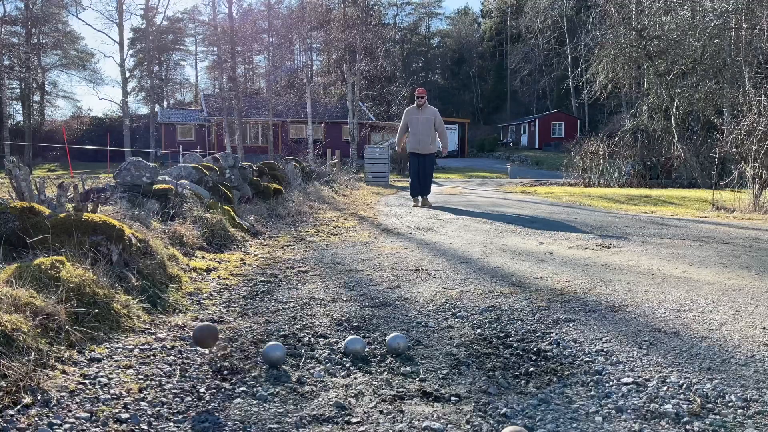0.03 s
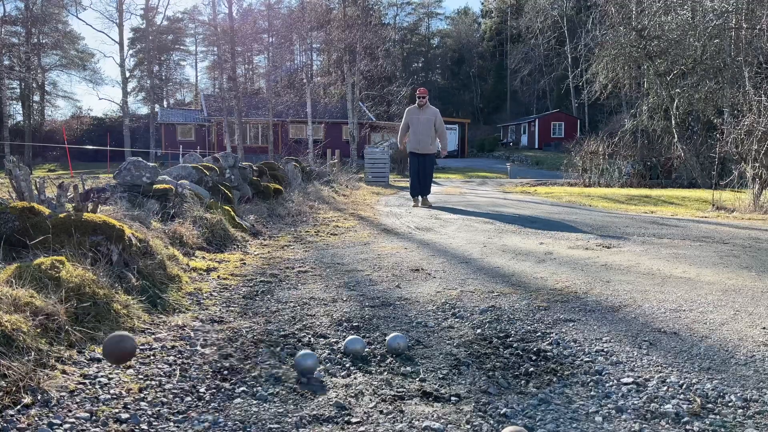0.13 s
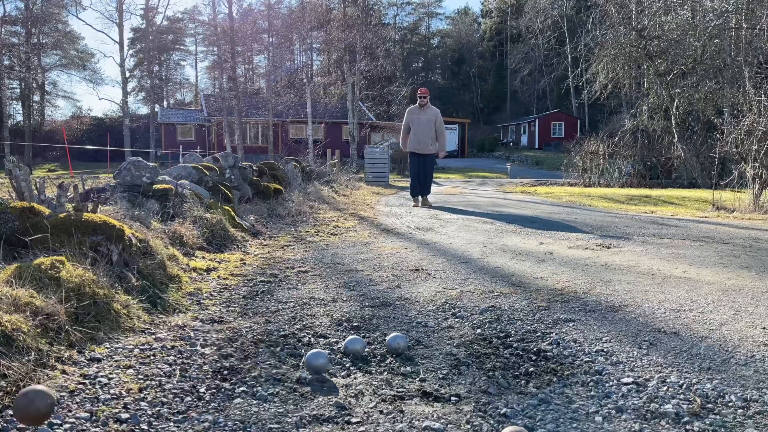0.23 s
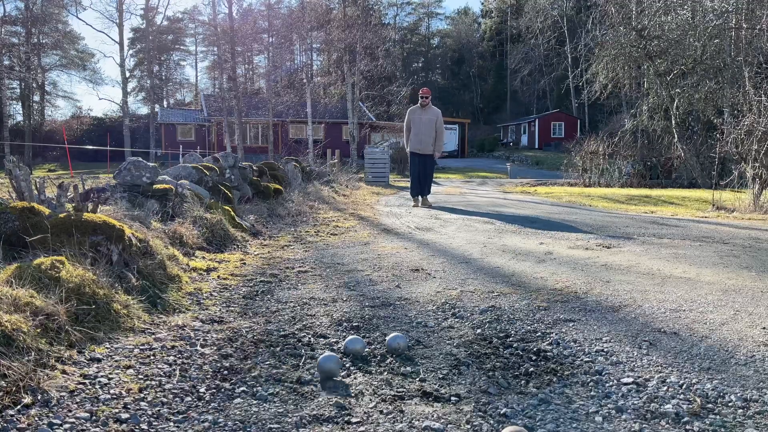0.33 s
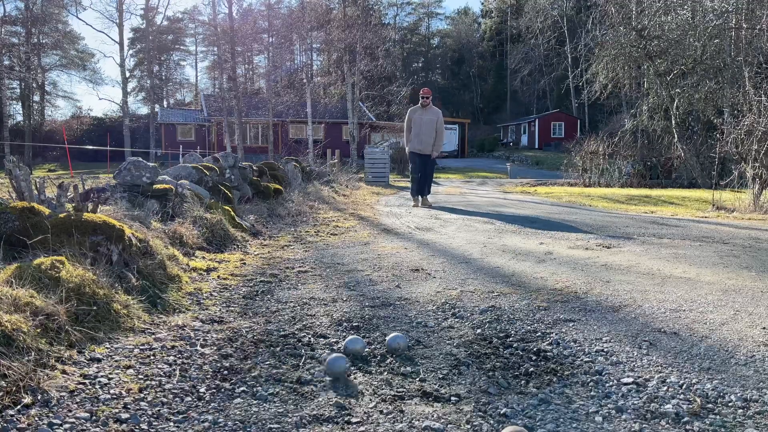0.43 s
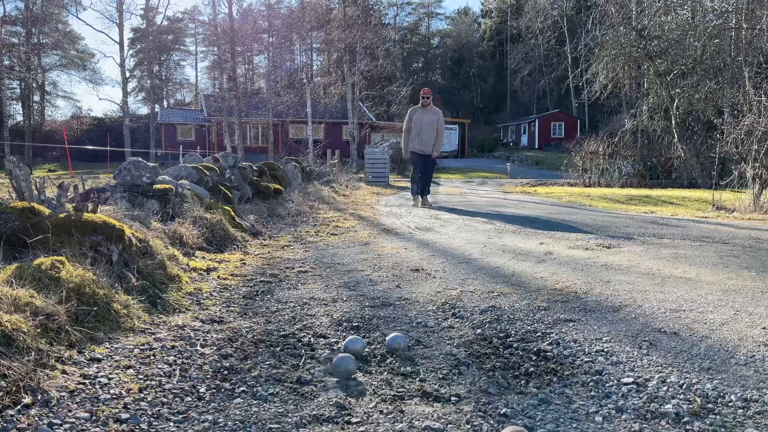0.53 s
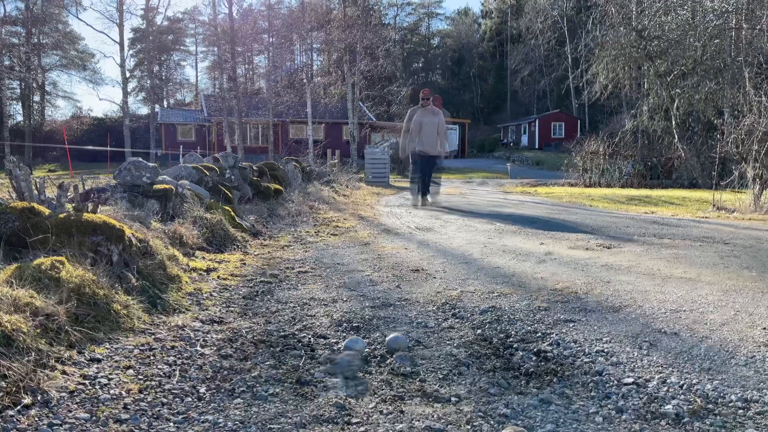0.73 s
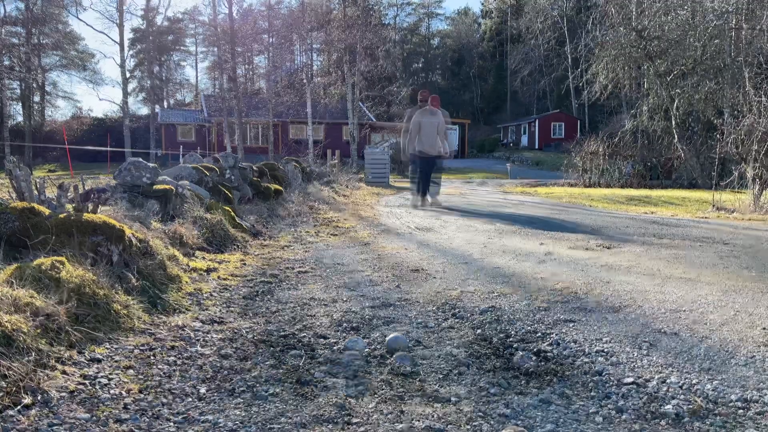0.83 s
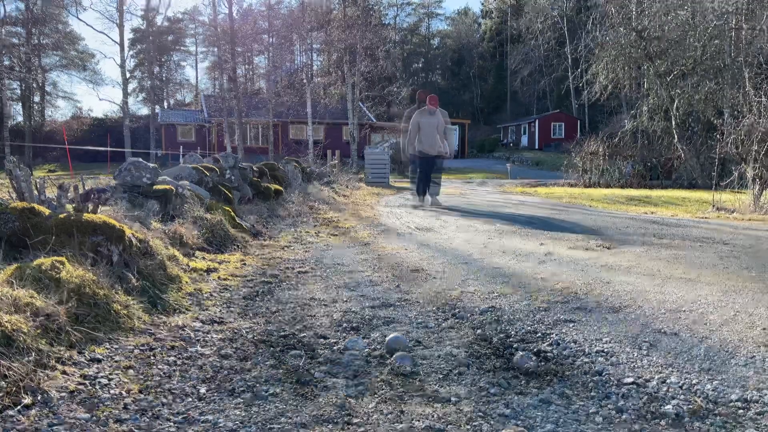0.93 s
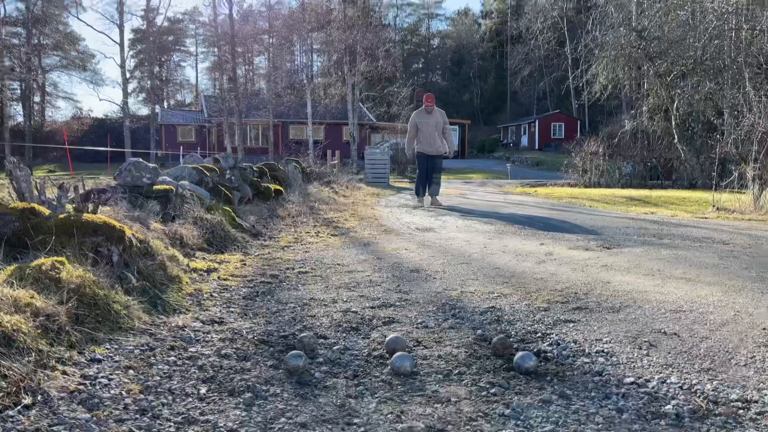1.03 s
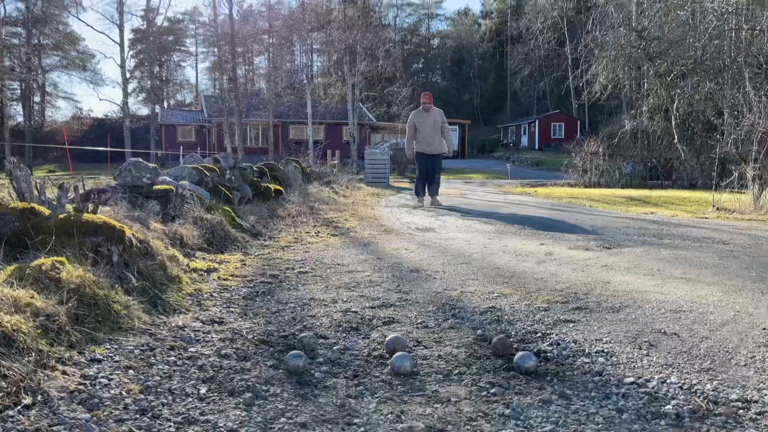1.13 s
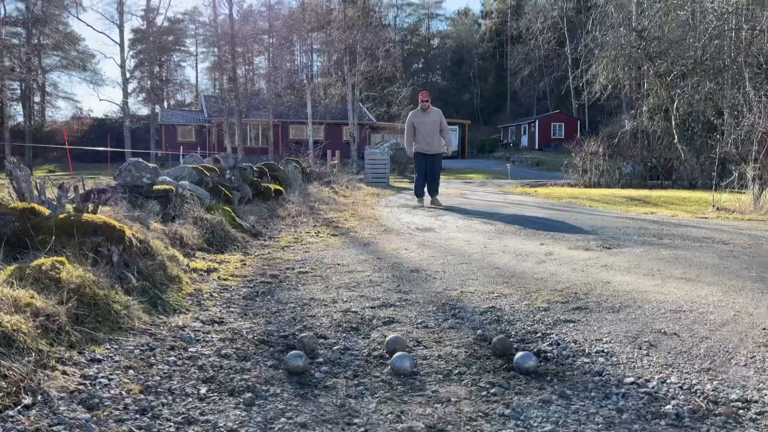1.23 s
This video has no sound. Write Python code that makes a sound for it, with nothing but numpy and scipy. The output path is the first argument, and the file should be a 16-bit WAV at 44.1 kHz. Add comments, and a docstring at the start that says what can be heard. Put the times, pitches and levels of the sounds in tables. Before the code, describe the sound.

Heavy steel balls roll right past a microphone on a gravel lane outdoors: deep rumbling and thuds, pebbles crunching, a bright metallic clack, then a hollow hard knock, a smaller clack and fading ticks.

```python
"""Open air, a gravel lane: steel boules roll right past a microphone standing on the ground.
From the start, random bumps and noise, shaped in colour and level, make the rolling, grit and faint hush.
Pebbles crunch as bursts of chattering contacts; low notes that swell and die shake the ground as thuds.
Then steel and stone clack as sharper bursts, and decaying sine modes ring after the blows.
Faint ticks spread apart as the rolling dies away; the ground and a low wall add a short scatter."""
import sys
import numpy as np
from scipy import signal
from scipy.fft import rfft, irfft, next_fast_len
from scipy.io import wavfile
from scipy.ndimage import uniform_filter1d

SR = 44100
rng = np.random.default_rng(int(sys.argv[2]) if len(sys.argv) > 2 else 0)


def digitize_waveform(pressure):
    """Quantize a signal to 16-bit integers and store it at the path in sys.argv[1].

    Rows of a 2-D input are taken as channels; values are limited to [-1, 1].
    """
    field = np.atleast_2d(pressure).T
    bounded = np.clip(field, -1, 1)
    quanta = np.round(bounded * 32767).astype(np.int16)
    wavfile.write(sys.argv[1], SR, quanta)


N = 57330


def amp(db):
    """Decibels to gain."""
    return 10 ** (np.asarray(db) / 20)


def unit(x):
    """Scale to rms 1."""
    return x / np.sqrt(np.mean(x ** 2) + 1e-20)


def along(points, hz):
    """Read (frequency, value) points on a log frequency axis."""
    f, v = np.transpose(points)
    return np.interp(np.log(hz + 1), np.log(f + 1), v)


def curves(rows):
    """One value per sample for each column after the time."""
    s, *columns = np.transpose(rows)
    return [np.interp(np.arange(N) / SR, s, column) for column in columns]


def filtered(x, response):
    """x times a complex response of frequency."""
    m = next_fast_len(N + SR // 2)
    spectrum = rfft(x, m) * response(np.fft.rfftfreq(m, 1 / SR))
    return irfft(spectrum, m)[..., :N]


def coloured(x, colour):
    """x shaped by the given colour, at rms 1."""
    return unit(filtered(x, lambda hz: amp(along(colour, hz))))


def add(track, s, sound):
    """Lay a sound into a track at time s."""
    i = max(0, round(s * SR))
    track[i:i + len(sound)] += sound[:len(track) - i]


def specks(size, rate, spread_db):
    """Tiny random contacts of uneven strength, rate a second, at rms 1."""
    chance = rng.random(size)
    sign = rng.choice([-1, 1], size)
    strength = np.clip(rng.standard_normal(size), -2, 2)
    return unit((chance < rate / SR) * sign * amp(spread_db * strength))


# drumming of the rolling boules, before the trim: (time [s], level [dB])
ROLL = [(0, -52), (.115, -72), (.155, -53), (.27, -46), (.35, -48.5), (.40, -40), (.47, -40.5), (.505, -54),
        (.54, -39), (.61, -49.5), (.67, -43.5), (.755, -37.5), (.85, -66), (.94, -48.5), (.98, -64),
        (1.06, -74.5), (1.11, -58.5), (1.3, -79)]
# its colour through the ground: (frequency [Hz], relative gain [dB])
ROLL_COLOUR = [(60, -27.5), (130, -2), (200, 2.5), (330, -4), (800, -24), (1300, -46), (3000, -69)]
ROLL_TRIM_DB = -1


def rolling():
    """Countless small bumps under the boules drum through the ground."""
    level_db, = curves(ROLL)
    drum = coloured(specks(N, rate=980, spread_db=3.0), ROLL_COLOUR)
    return amp(level_db + ROLL_TRIM_DB) * drum


# deep rumble in the ground, before the trim: (time [s], level [dB])
RUMBLE = [(0, -43), (.04, -56), (.125, -61), (.17, -44.5), (.27, -45), (.385, -38), (.425, -32.5),
          (.475, -31.5), (.51, -47), (.58, -38), (.715, -44.5), (.76, -40), (.88, -50), (.945, -45.5),
          (.985, -55.5), (1.3, -65)]
# its colour: (frequency [Hz], relative gain [dB])
RUMBLE_COLOUR = [(28, -22), (45, -3.5), (65, 2), (110, -3), (160, -8.5), (300, -33), (800, -73)]
RUMBLE_TRIM_DB = -1.5


def rumble():
    """The rolling shakes the ground: low noise, its own swells evened out, follows the level."""
    level_db, = curves(RUMBLE)
    deep = signal.hilbert(coloured(rng.standard_normal(N), RUMBLE_COLOUR))
    power = np.abs(uniform_filter1d(np.abs(deep) ** 2, size=1400))  # over about 32 ms
    deep = unit(deep.real / np.sqrt(power + 1e-9))
    return amp(level_db + RUMBLE_TRIM_DB) * deep


# hollow scraping, before the trim: (time [s], level [dB])
SCRAPE = [(0, -67), (.13, -77), (.26, -82), (.29, -46.5), (.315, -74), (.36, -61), (.39, -40.5), (.42, -53),
          (.447, -69), (.465, -48.5), (.50, -70), (.685, -56), (.71, -36.5), (.75, -42), (.78, -59),
          (.82, -67.5), (1.3, -78)]
# its colour: (frequency [Hz], relative gain [dB])
SCRAPE_COLOUR = [(120, -36.5), (280, -4.5), (420, -2.5), (650, -2), (1200, -19), (2500, -64.5)]
SCRAPE_TRIM_DB = -0.5


def scraping():
    """Stones scrape where a boule presses hard: dense contacts with a hollow colour."""
    level_db, = curves(SCRAPE)
    scrape = coloured(specks(N, rate=960, spread_db=4), SCRAPE_COLOUR)
    return amp(level_db + SCRAPE_TRIM_DB) * scrape


# gravel by grain, before the trims: (time [s], coarse grit level [dB], fine sand level [dB])
GRIT = [(0, -49.5, -60), (.07, -59.5, -73), (.115, -68, -65.5), (.15, -53.5, -55.5), (.20, -50.5, -62.5),
        (.28, -52, -79), (.35, -57.5, -56.5), (.515, -65.5, -66.5), (.565, -63, -44.5), (.635, -75, -66.5),
        (.68, -54, -51.5), (.715, -50.5, -70.5), (.79, -69, -78.5), (.875, -71.5, -83.5), (.91, -64, -60),
        (1.05, -73, -77), (1.09, -67, -61.5), (1.18, -74.5, -78.5), (1.3, -75.5, -102)]
# colours of coarse grit and of fine sand: (frequency [Hz], relative gain [dB])
GRIT_COLOUR = [(200, -8), (700, -4), (2000, 3), (3200, -1.5), (4500, -11), (8000, -20), (15000, -59.5)]
SAND_COLOUR = [(1000, -27.5), (3500, -4), (6000, -3), (10800, 6), (12200, -15.5), (14000, -17),
               (16000, -40)]
GRIT_TRIM_DB, SAND_TRIM_DB = -1, 2


def gravel():
    """Coarse grit and fine sand grind under the rolling steel as dense tiny contacts."""
    grit_db, sand_db = curves(GRIT)
    grit = coloured(specks(N, rate=3000, spread_db=5.5), GRIT_COLOUR)
    sand = coloured(specks(N, rate=5700, spread_db=3), SAND_COLOUR)
    return amp(grit_db + GRIT_TRIM_DB) * grit + amp(sand_db + SAND_TRIM_DB) * sand


# colour of the outdoor hush: (frequency [Hz], relative gain [dB])
AIR_COLOUR = [(20, -11), (400, -25), (800, -9), (2000, -23.5), (4500, -24.5), (11000, -32), (14000, -58.5)]
AIR_DB = -71.5


def open_air():
    """A faint steady outdoor hush: independent noise on each side."""
    return amp(AIR_DB) * coloured(rng.standard_normal((2, N)), AIR_COLOUR)


# bands of a contact, in order body, clack, click, sizzle: (low edge [Hz], high edge [Hz])
BAND_EDGES_HZ = [(300, 1136), (1300, 3710), (4000, 11000), (9700, 12400)]


def contacts(rows, snap, rate, spread_db, sag_db, release_s):
    """Each contact is one sharp snap, then grit chatters for its length and stops quickly."""
    out, t = np.zeros(N), np.arange(SR // 10) / SR
    bands = [signal.butter(N=5, Wn=edges, btype="band", fs=SR, output="sos") for edges in BAND_EDGES_HZ]
    for s, length, *levels in rows:
        sag = -sag_db * np.minimum(t / length, 1)
        release = -60 * np.maximum(t - length, 0) / release_s
        force = specks(len(t), rate, spread_db) * amp(sag + release)
        force[0] += snap * np.linalg.norm(force)
        for band, db in zip(bands, levels):
            part = signal.sosfilt(band, force)
            # the whole burst carries the energy of this level held for its length
            add(out, s, amp(db) * np.sqrt(length * SR) * part / np.linalg.norm(part))
    return out


# pebbles crushed aside:
# (time [s], length [s], body level [dB], clack level [dB], click level [dB], sizzle level [dB])
CRUNCHES = [(.0435, 0.0077, -55, -45, -48, -50), (.054, 0.0067, -58, -54, -45, -46.5),
            (.079, 0.0085, -63.5, -49.5, -68, -65), (.168, 0.013, -55, -49, -49.5, -56.5),
            (.2765, 0.0027, -55, -52, -44, -55), (.294, 0.0019, -52, -56, -46, -43),
            (.438, 0.0013, -68, -67, -49, -45), (.4795, 0.0042, -77, -56, -47, -47),
            (.5255, 0.0038, -39.5, -42, -36.5, -32.5), (.5303, 0.004, -43, -47.5, -32, -34),
            (.542, 0.0056, -67, -58, -50, -52), (.5567, 0.0011, -70, -54, -35.5, -26),
            (.5595, 0.0033, -68, -67, -41, -35), (.569, 0.0081, -63, -60, -50, -56),
            (.587, 0.0096, -63, -50.5, -39, -42), (.941, 0.0033, -56, -53, -52, -60),
            (1.028, 0.0061, -57, -60.5, -74.5, -82.5)]


def crunches():
    """Pebbles crushed aside: a snap, then sparse chatter with a longer release."""
    return contacts(CRUNCHES, snap=0.45, rate=3200, spread_db=2.5, sag_db=3, release_s=0.038)


# ground shaken by a boule: (time [s], level at the top of the swell [dB], pitch [Hz])
THUDS = [(0.166, -33, 254), (.219, -33, 264), (.250, -28, 178), (.288, -22.5, 268), (0.295, -28, 125),
         (.331, -34.5, 81.5), (0.375, -24.5, 292), (.388, -22, 395), (.411, -21.5, 270),
         (0.417, -26.5, 450), (0.423, -22, 109.5), (.462, -24.5, 269), (.690, -21.5, 222),
         (.698, -31.5, 197), (0.742, -26.5, 256), (.788, -35.5, 130), (0.935, -32.5, 130)]
THUD_RISE_CYCLES = 0.52


def thuds():
    """Each bump swells and dies within a few cycles of the ground's low note."""
    out, t = np.zeros(N), np.arange(SR // 10) / SR
    for s, db, hz in THUDS:
        u = t * hz / THUD_RISE_CYCLES
        swell = u * np.exp(1 - u)
        add(out, s, amp(db) * swell * np.sin(2 * np.pi * hz * t))
    return out


# hard contacts of steel and stone:
# (time [s], length [s], body level [dB], clack level [dB], click level [dB], sizzle level [dB])
CLACKS = [(.3208, 0.0036, -33, -37.5, -23.5, -19), (.3272, 0.0055, -43.5, -35, -24.5, -22),
          (.654, 0.0054, -47, -46, -35.5, -40), (.6898, 0.0034, -30, -28, -43.5, -47),
          (.6962, 0.0039, -35, -30, -45, -62), (.8864, 0.0024, -48, -36.5, -36, -39.5),
          (.890, 0.0014, -41, -36.5, -32.5, -44)]


def clacks():
    """Steel and stone meet hard: a snap, then dense chatter with a short release."""
    return contacts(CLACKS, snap=0.35, rate=8000, spread_db=3.0, sag_db=3, release_s=0.022)


# ringing modes of struck boules, jolted stones, the knock, the last clack and a light tap:
# (frequency [Hz], starting level [dB])
STEEL_MODES = [(625, -27.5), (940, -33.5), (1130, -34.5), (1270, -33.5), (1990, -32.5), (5940, -27),
               (10545, -25.5), (11080, -38.5)]
STONE_MODES = [(530, -29.5), (800, -35.5), (1120, -41)]
KNOCK_MODES = [(430, -17.5), (630, -19.5), (810, -22), (1000, -21.5), (1480, -30.5), (1820, -29.5),
               (2340, -26), (2630, -26.5)]
LAST_CLACK_MODES = [(580, -40.5), (860, -42.5), (1130, -44), (1820, -42), (2520, -34), (3950, -41.5)]
TAP_MODES = [(1330, -52.5), (2100, -58)]
# blows that set them ringing: (time [s], time to fall 60 dB [s], modes)
STRIKES = [(.3272, 0.04, STEEL_MODES), (.5303, 0.036, STONE_MODES), (.6902, 0.028, KNOCK_MODES),
           (.813, 0.045, TAP_MODES), (.8866, 0.029, LAST_CLACK_MODES)]
MODE_RISE_S = 0.00023


def ring():
    """Steel and stone ring briefly after each blow, as a set of decaying sine modes."""
    out, t = np.zeros(N), np.arange(SR // 2) / SR
    rise = 1 - np.exp(-t / MODE_RISE_S)
    for s, t60, modes in STRIKES:
        for k, (hz, db) in enumerate(modes):
            sign = (-1) ** k  # neighbouring modes start in opposite directions
            add(out, s, sign * rise * amp(db - 60 * t / t60) * np.sin(2 * np.pi * hz * t))
    return out


TONE_S, TONE_LENGTH_S, TONE_HZ, TONE_DB, TONE_T60_S = .691, 0.125, 3545, -56, 0.5


def thin_tone():
    """A faint thin decaying tone follows the hardest knock and stops after an eighth of a second."""
    out, t = np.zeros(N), np.arange(SR // 2) / SR
    stop = np.clip((TONE_LENGTH_S - t) / .01, 0, 1)  # fades out over the last 10 ms
    tone = amp(TONE_DB - 60 * t / TONE_T60_S) * np.sin(2 * np.pi * TONE_HZ * t)
    add(out, TONE_S, stop * tone)
    return out


# span of the faint ticking, before jitter: (start [s], end [s])
TICK_SPAN = (.855, 1.135)
TICK_HZ, TICK_DB = 4400, -62  # centres of the random pitch and level
TICK_SLOWING = 1.45  # exponent above 1: the gaps widen


def ticking(rise_s=0.00056, count=21):
    """A faint run of short high ticks, ever further apart on the whole, as the rolling fades."""
    out, t = np.zeros(N), np.arange(SR // 50) / SR
    start, end = TICK_SPAN
    swell = t / rise_s * np.exp(1 - t / rise_s)
    for s in start + (end - start) * np.linspace(0, 1, count) ** TICK_SLOWING:
        shift, loud, sharp = rng.standard_normal(3)
        hz = TICK_HZ * (1 + 0.041 * sharp)
        tick = swell * np.sin(2 * np.pi * hz * t)
        add(out, s + 0.0017 * shift, amp(TICK_DB + 2 * loud) * tick)
    return out


# the ports move as one below this range and fully apart above it: (low edge [Hz], high edge [Hz])
MONO_HZ = (550, 1000)
SCATTER_DB, SCATTER_T60_S = -16.5, 0.038


def scatter(x):
    """The ground and a low stone wall return a short diffuse tail to each side, thin in the bass."""
    t = np.arange(SR // 4) / SR
    tail = rng.standard_normal((2, len(t))) * amp(-60 * t / SCATTER_T60_S)
    returned = signal.fftconvolve(x[None], tail / np.linalg.norm(tail[0]), axes=1)[:, :N]
    return amp(SCATTER_DB) * filtered(returned, lambda hz: hz ** 2 / (hz ** 2 + MONO_HZ[0] ** 2))


# the microphone's two ports, before the fade to mono: (frequency [Hz], phase that left leads [rad])
PORT_PHASE = [(900, 1.44), (1350, 1.14), (2000, 0.25), (3500, 1.5), (4300, -0.27), (4800, 4), (5700, 5.5),
              (12500, 12)]
# likewise: (frequency [Hz], left minus right [dB])
PORT_BALANCE = [(700, -2), (1150, 4), (1700, 0), (12000, 1)]


def ports(x):
    """Above the bass, the two ports hear the same sound with different phase and level."""
    side, lead = np.array([[.5], [-.5]]), np.array([[0], [-1]])  # left, right

    def response(hz):
        apart = np.interp(hz, MONO_HZ, [0, 1])
        gain = amp(side * apart * along(PORT_BALANCE, hz))
        return gain * np.exp(1j * lead * apart * along(PORT_PHASE, hz))

    return filtered(x, response)


def scene():
    """Rolling, crunches and clacks close by, with the scatter and hush of the open air."""
    airborne = gravel() + crunches() + clacks() + ring() + thin_tone() + ticking()
    ground = rolling() + rumble() + scraping() + thuds()
    return ports(airborne + ground) + scatter(airborne) + open_air()


# shape of the top treble: (frequency [Hz], gain [dB])
TOP_TREBLE = [(11500, 0), (13000, -14), (16000, 5)]
TOP_HZ = 16400


def record(dry):
    """The top treble is thinned near 13 kHz, fuller above, and fades out at 16.4 kHz."""
    def response(hz):
        cut = np.clip((TOP_HZ - hz) / 600, 0, 1)  # fades out over the last 600 Hz
        return amp(along(TOP_TREBLE, hz)) * cut

    return filtered(dry, response)


dry = scene()
out = record(dry)
digitize_waveform(out)
```